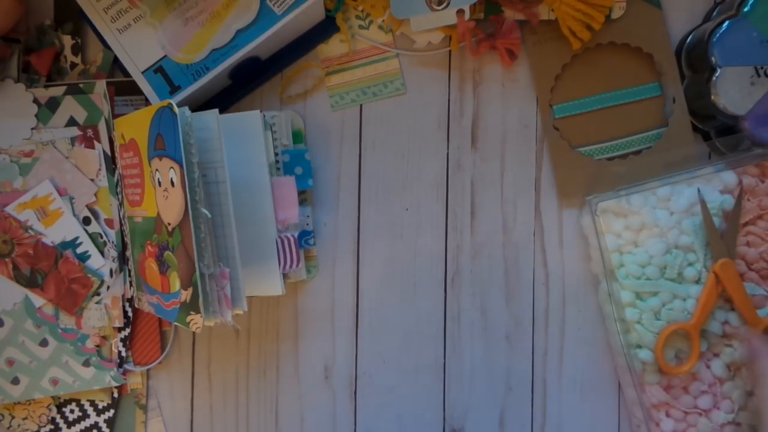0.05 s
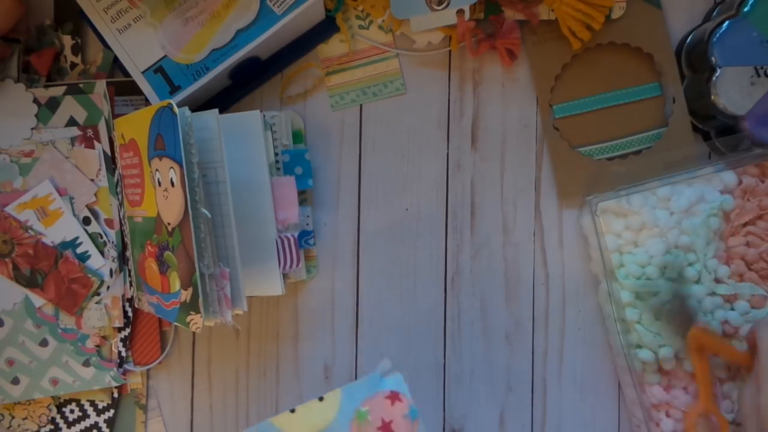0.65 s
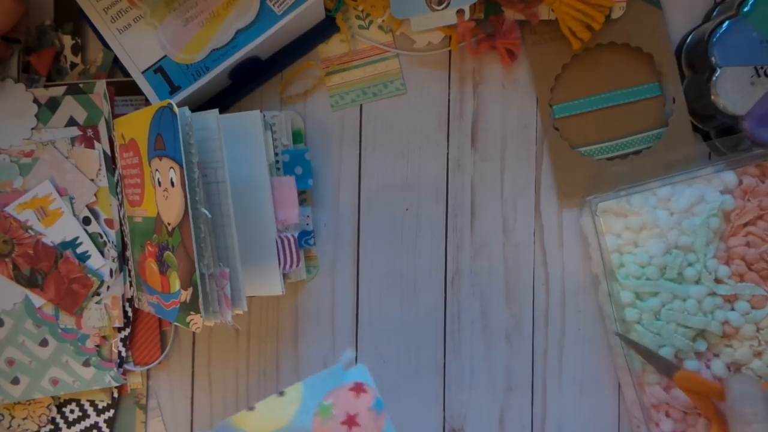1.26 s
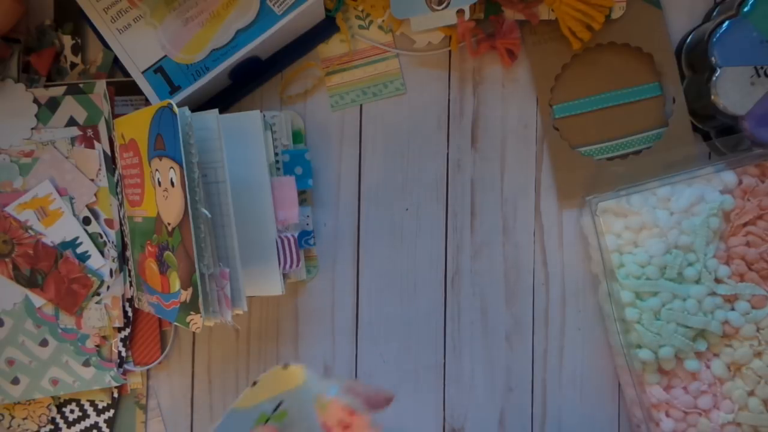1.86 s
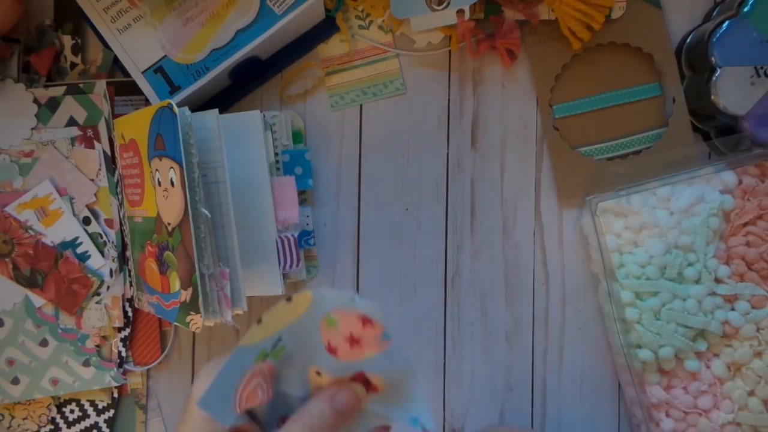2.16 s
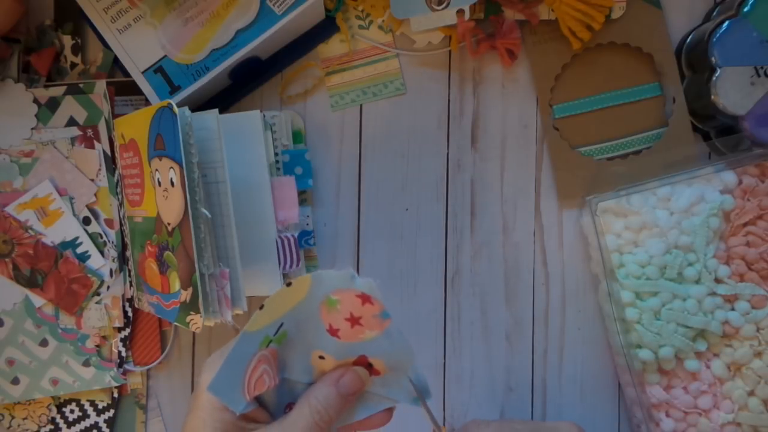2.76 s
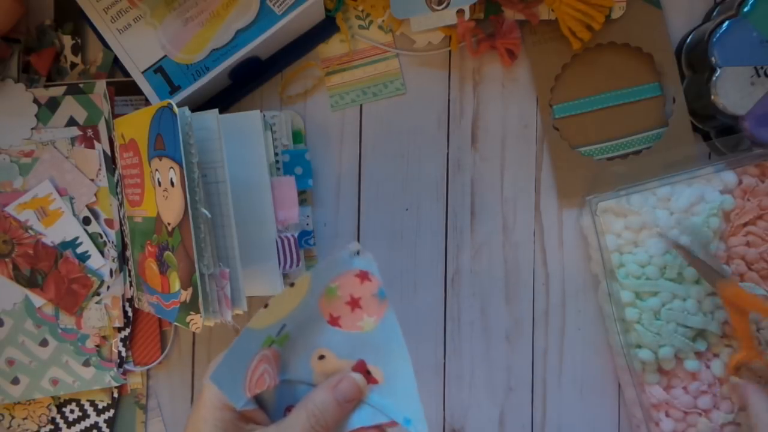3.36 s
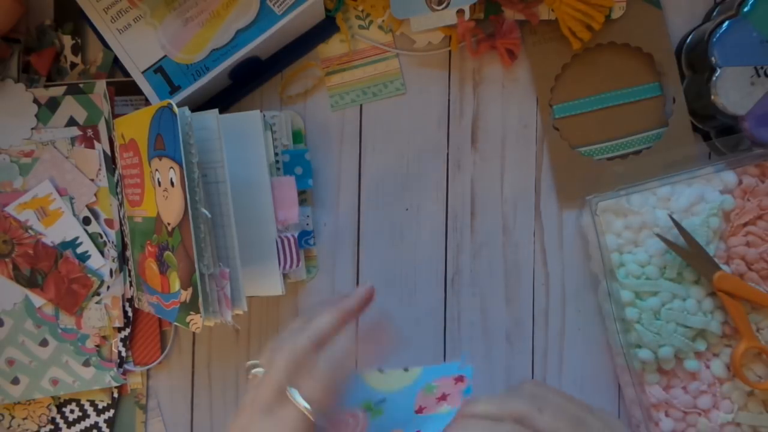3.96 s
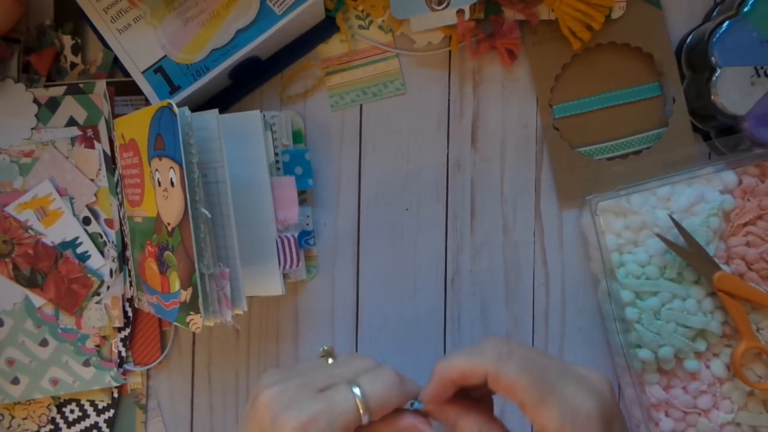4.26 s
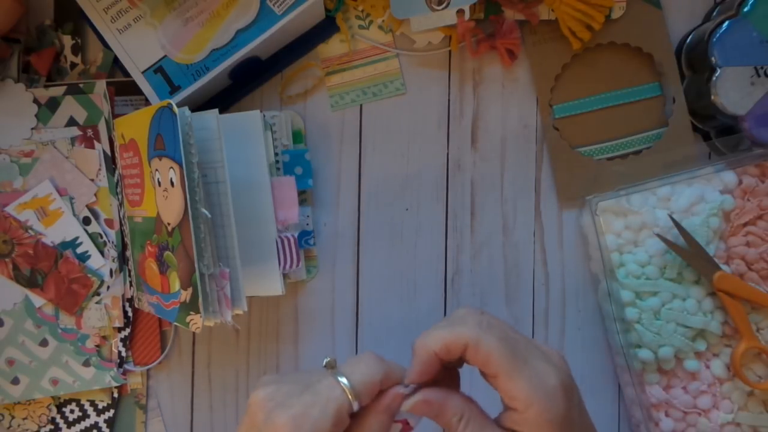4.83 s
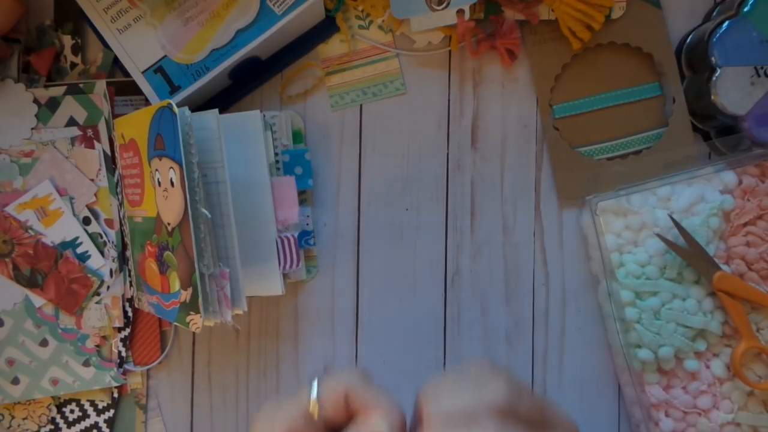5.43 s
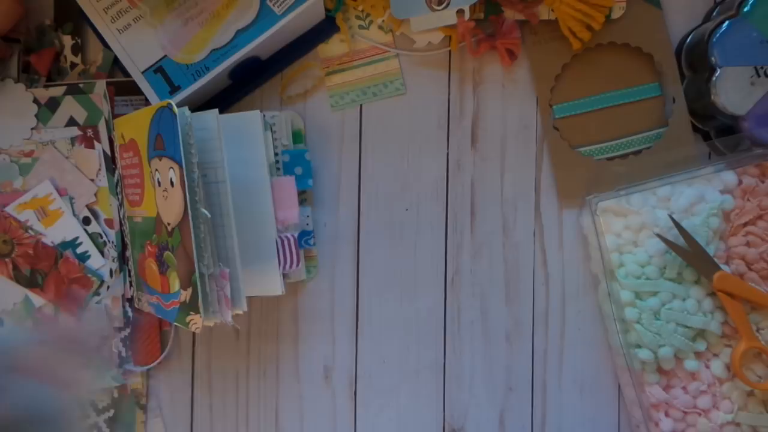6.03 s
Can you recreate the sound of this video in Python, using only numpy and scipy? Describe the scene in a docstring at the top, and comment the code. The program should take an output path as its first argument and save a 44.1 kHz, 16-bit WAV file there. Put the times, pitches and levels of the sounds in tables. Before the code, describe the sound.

Scissors clatter on a plastic box, make a faint snip and are dropped back, then a strip of cotton is quickly ripped.

```python
"""Scissors knock on a plastic box at a craft desk: each blow is a steel click, a ringing lid, rebounds.
Picked up, they rub and scrape; the blades slide open and nick a piece of cotton, a hiss of tiny slips.
They are dropped back on the box. Fingers pluck at the nick, then a strip is ripped off: a fast run of
snapping threads that makes the taut cloth rasp and drum. Behind it: a small room, faint rumble and hiss."""
import sys
import numpy as np
from scipy import signal
from scipy.fft import rfft, irfft
from scipy.io import wavfile

SR = 44100
rng = np.random.default_rng(int(sys.argv[2]) if len(sys.argv) > 2 else 0)


def pcm_store(signal):
    """Save signal as 16-bit PCM."""
    levels = np.round(np.clip(np.atleast_2d(signal), -1, 1) * 32767)
    wavfile.write(sys.argv[1], SR, levels.astype(np.int16).T)


N = 272934
TIME = np.arange(N) / SR


# Blows on the box: t/s, relative click level/dB, relative thump level/dB, hardness/(dB/octave)
KNOCKS = [(0.1754, -8, -21.5, 3.5), (0.2028, -17, -33, -5), (0.3501, -14.5, -26, -3), (0.3934, -18, -32, 8),
          (0.5342, -34, -33.5, -7), (0.5531, -24.5, -37, -10), (0.5692, -20.5, -26, -10),
          (0.5739, -17.5, -29.5, 4.5), (0.61, -20.5, -36, -2), (0.6387, -28.5, -36.5, 5),
          (0.6687, -36, -34, -6), (0.7467, -9, -22.5, 6), (0.7574, -16.5, -34, 4),
          (0.852, -16.5, -27.5, -8.5), (0.8659, -25, -35.5, -7), (0.9512, -28.5, -42.5, 5),
          (1.0369, -42, -38.5, -10.5), (1.1453, -37, -44.5, -6), (1.1896, -34, -29, -2.5),
          (1.2865, -25, -31, -0.5), (1.2988, -33, -36.5, 7), (1.3452, -36, -40, 5.5), (1.409, -31, -37, 7),
          (1.4151, -21, -37, -1), (1.548, -26, -32, -3.5), (3.4758, -16, -22.5, 13.5),
          (3.481, -1.5, -17.5, 10), (3.5218, -0.5, -12, 5), (3.5335, -9, -23, 5), (3.5703, -12, -23, 12.5),
          (3.5965, -8.5, -24, -1), (3.6102, -1.5, -16.5, 1), (3.6501, -32, -30.5, 4),
          (3.6765, -24, -32.5, -4), (3.723, -38, -42, 0)]
# Lid modes: f/Hz, level/dB, t60/s
LID_MODES = [(135.3, -17, 0.16), (226.6, -6.5, 0.072), (273, -6, 0.039), (331, 4, 0.022),
             (403, -0.5, 0.029), (451, -7.5, 0.05), (641, -15, 0.042), (860, -9.5, 0.014)]
# Steel-on-plastic spectrum: f/Hz, level/dB
CLICK_SPECTRUM = [(300, -0.5), (900, 2), (1800, 1.5), (2700, -1.5), (4200, -8), (6500, -3.5), (8000, -5.5),
                  (10500, 1), (13000, -5), (16000, -9)]
def knocks(click_db=-3, thump_db=7, rise_s=0.0013, rebound_s=0.021, rebound_db=-19.5):
    """Steel clicks, rings the lid and rebounds twice. Returns direct and smoother all-round sound."""
    t, out = np.arange(SR // 8) / SR, np.zeros((2, N))
    hz, mode_db, t60_s = np.transpose(LID_MODES)[:, :, None]
    octaves = np.log2(np.maximum(hz, 175) / np.median(hz))
    spots = rng.standard_normal((len(KNOCKS), 2, len(LID_MODES), 1))  # each spot rings differently
    gaps_s = rebound_s * (0.5 + rng.random((len(KNOCKS), 2)))
    for (s, click, thump, hardness), (detune, weight), gap_s in zip(KNOCKS, spots, gaps_s):
        ring_db = mode_db + hardness * octaves + 1.5 * weight
        # A soft blow stays on the lid; its weight lowers the pitch.
        ring_hz = hz * (1 + 0.04 * detune + 0.013 * min(hardness, 0))
        modes = amp(ring_db - 60 * t / t60_s) * np.sin(2 * np.pi * ring_hz * t)
        lid = amp(thump + thump_db) * modes.sum(0) * (1 - np.exp(-t / rise_s)) / 2
        # Blades click brighter than handles: treble follows the click's lead over the thump.
        tilt_db_oct = 0.19 * (click - thump - 11.5)
        contact = burst(t60_s=0.024, scatter_db=8, size=len(t))
        impulse = np.linalg.norm(contact) * (t == 0)
        for path, push in zip(out, [contact, impulse]):
            blow = lid + amp(click + click_db) * colour(push, CLICK_SPECTRUM, tilt_db_oct)
            for k, at_s in enumerate(np.cumsum([s, *gap_s])):
                add(path, at_s, amp(k * rebound_db) * blow)
    # A small box radiates no deep bass.
    return signal.sosfilt(signal.butter(3, 120, "high", fs=SR, output="sos"), out)


# Tugs of the rip: t/s, length/s, relative fine-thread level/dB, rasp gain/dB, drum level/dB
TUGS = [(5.591, .008, -35.5, 17, -48), (5.609, 0.034, -31, 4, -44), (5.646, 0.048, -27.5, 6, -49.5),
        (5.711, .046, -30, -16.5, -39), (5.766, .063, -31.5, -2, -53), (5.828, 0.0445, -25, -8, -38.5)]
def tugs(levels_db):
    """Gain curve of the pulls on the cloth, each at its own level."""
    return sum(amp(db) * envelope(s, length_s, attack_s=0.0018, release_s=0.048)
               for (s, length_s, *_), db in zip(TUGS, levels_db))


# Strongest threads breaking: t/s, relative level/dB
SNAPS = [(5.5943, -19.5), (5.612, -8.5), (5.622, -11), (5.66, -15.5), (5.7135, -4), (5.73, -4),
         (5.7355, -2.5), (5.7491, 0), (5.7541, 1), (5.7673, -2.5), (5.7781, -2), (5.7872, -1.5),
         (5.8035, -1), (5.8128, -0.5), (5.8349, -3), (5.8488, -2)]
# Breaking-thread spectrum: f/Hz, level/dB
THREAD_SPECTRUM = [(30, -26.5), (80, -10.5), (220, -8), (350, -1), (750, 1), (1200, -4.5), (2000, 0),
                   (3050, 2), (3600, 0), (4800, 1), (7000, -2), (10000, -0.5), (12800, 2), (16000, -1)]
# Held-cloth resonances: f/Hz, width/Hz, level/dB
CLOTH_MODES = [(612, 110, -5.5), (2406, 56, 3.5), (2990, 290, -1.5), (4860, 510, -13), (5750, 210, -6)]
def rip(snap_db=-2, fine_db=-4):
    """Threads break in turn; each snap shakes the taut cloth in its own way for a few milliseconds."""
    start_s, length_s, threads_db, rasp_db, _ = np.transpose(TUGS)
    breaks = grains(per_s=900, spread_db=3) * rng.choice([-1, 1], N)
    breaks = unit_rms(breaks) * tugs(threads_db + fine_db)
    for s, db in SNAPS:
        add(breaks, s, amp([db + snap_db]))
    shakes = np.zeros(N)
    for i in np.flatnonzero(breaks):
        add(shakes, i / SR, breaks[i] * burst(t60_s=0.026, scatter_db=5.5))
    cloth = colour(shakes, THREAD_SPECTRUM)
    rasp = sum(amp(db) * signal.lfilter(*signal.iirpeak(hz, hz / width_hz, SR), cloth)
               for hz, width_hz, db in CLOTH_MODES)
    # Most rasp while the hands are still close together.
    return cloth + rasp * amp(np.interp(TIME, start_s + length_s / 2, rasp_db))


def cloth_drum(slack_hz=255, taut_hz=365, half_width_hz=90):
    """The cloth drums low; its resonance rises with tension, peaking at mid-rip."""
    start_s, length_s, _, _, drum_db = np.transpose(TUGS)
    progress = np.interp(TIME, [start_s[0], start_s[-1] + length_s[-1]], [0, 1])
    hz = slack_hz + (taut_hz - slack_hz) * np.sin(np.pi * progress)
    noise = rng.standard_normal(N) + 1j * rng.standard_normal(N)
    shake = signal.sosfilt(signal.butter(2, half_width_hz, fs=SR, output="sos"), noise)
    carrier = np.exp(2j * np.pi * np.cumsum(hz) / SR)
    return unit_rms((shake * carrier).real) * tugs(drum_db)


# Thread and weave ticks around the rip: t/s, relative level/dB, tilt/(dB/octave)
TICKS = [(4.302, -39, -3.5), (5.102, -37.5, 1.5), (5.485, -35.5, -3.5), (5.562, -28, -2.5),
         (5.565, -31.5, 3), (5.976, -25.5, 5), (6.173, -43, -4)]
def thread_ticks(gain_db=-3):
    """Lone threads give way under the fingers."""
    out = np.zeros(N)
    for s, db, tilt_db_oct in TICKS:
        snap = burst(t60_s=0.022, scatter_db=11)
        add(out, s, amp(db + gain_db) * colour(snap, THREAD_SPECTRUM, tilt_db_oct))
    return out


# Sliding strokes: t/s, length/s, end level/dB
SLIDES = [(.24, 0.072, -56.5), (.68, 0.053, -43.5), (1.18, 0.012, -46.5), (1.195, 0.11, -48),
          (1.408, 0.0088, -41), (1.533, .022, -38.5), (1.638, 0.011, -51.5), (4.58, 0.13, -68.5),
          (5.13, 0.097, -73)]
# Sliding spectrum: f/Hz, level/dB
SLIDE_SPECTRUM = [(40, -34), (150, 16.5), (400, 12), (900, 9.5), (2400, 1.5), (4500, 1.5), (7000, 4),
                  (10000, 3.5), (13000, 6), (16000, -6)]
def slides(grip_db=-64.5):
    """Blades and fingers slide over plastic and cloth; the hand rubs the scissors as it lifts them."""
    grip = amp(grip_db) * envelope(start_s=0.12, length_s=1.54, attack_s=0.05, release_s=0.52)
    return friction(strokes(SLIDES) + grip, SLIDE_SPECTRUM, per_s=5200, spread_db=1)


# Blade strokes: t/s, length/s, end level/dB
SHEARS = [(1.263, 0.024, -37), (1.643, .012, -44.5), (2.822, 0.041, -58), (2.868, 0.024, -55),
          (2.895, .015, -56), (2.922, 0.021, -54)]
# Shearing spectrum: f/Hz, level/dB
SHEAR_SPECTRUM = [(40, -48), (250, 0.5), (1200, -3), (2500, -7.5), (5000, -11), (7200, -8), (8200, -10),
                  (9600, 6), (11000, -6), (13500, -2), (16000, -7.5)]
def blade_shear():
    """The blades shear past each other: dense slips, a fine hiss."""
    return friction(strokes(SHEARS), SHEAR_SPECTRUM, per_s=22000, spread_db=-2)


# Handle strokes: t/s, length/s, end level/dB
SCRAPES = [(.675, 0.0476, -44.5), (1.1, .025, -53), (1.19, 0.107, -52)]
# Scraping spectrum: f/Hz, level/dB
SCRAPE_SPECTRUM = [(40, -15), (150, -2), (400, 15.5), (700, 0), (1100, 1), (1600, 1), (2200, 5.5),
                   (3000, -3), (4200, -14), (16000, -15)]
def handle_scrape():
    """The handles scrape over the lid: sparse slips, a coarse grain."""
    return friction(strokes(SCRAPES), SCRAPE_SPECTRUM, per_s=560, spread_db=2.5)


def friction(gain, spectrum, per_s, spread_db):
    """Tiny slips crowd into a hiss under a gain curve."""
    slips = unit_rms(grains(per_s, spread_db) * rng.standard_normal(N))
    return colour(slips * gain, spectrum)


def strokes(rows):
    """Gain curve of strokes that gather speed, then stop."""
    return sum(amp(db) * envelope(s, length_s, attack_s=0.0068, release_s=0.015, swell_db=10)
               for s, length_s, db in rows)


# Desk, shelf and wall reflections: delay/s, gain/1
ECHOES = [(.0031, 0.15), (.0094, 0.13), (0.0124, .22), (0.0155, 0.12)]
# Room decay: f/Hz, t60/s
ROOM_DECAY = [(120, 0.39), (400, 0.3), (1200, 0.34), (3000, 0.27), (8000, 0.27), (13000, 0.21),
              (16000, 0.2)]
def room(direct, all_round, wet_db, build_s=0.0027, fade_hz=7, tails=3, null_hz=157.4, null_width_hz=32):
    """Direct sound, near reflections and a smooth diffuse tail, steadily crossfaded among noise decays."""
    out = direct.copy()
    for s, gain in ECHOES:
        add(out, s, gain * direct)
    for k in range(tails):
        hz, t, noise = signal.stft(rng.standard_normal(SR // 2), SR, nperseg=256)
        decay = amp(-60 * t / lookup(ROOM_DECAY, hz)[:, None])
        tail = signal.istft(noise * decay * (1 - np.exp(-t / build_s)), SR, nperseg=256)[1]
        share = np.sqrt(2 / tails) * np.cos(np.pi * (fade_hz * TIME + k / tails))
        out += amp(wet_db) * signal.oaconvolve(all_round * share, tail / np.linalg.norm(tail))[:N]
    # Reflections cancel a narrow band of bass.
    return signal.lfilter(*signal.iirnotch(null_hz, null_hz / null_width_hz, SR), out)


# Background spectral density: f/Hz, relative level/dB
FLOOR_SPECTRUM = [(15, -60.5), (25, -10), (43, -1.5), (123, -3), (185, -3.5), (217, -3.5), (270, -8),
                  (384, -10.5), (416, -11), (962, -17.5), (1740, -21.5), (9070, -26.5), (11600, -26),
                  (16000, -28.5)]
def noise_floor(level_db=-66.5, waver_db=1, split_hz=500):
    """Steady microphone hiss over a slightly wavering room rumble."""
    shape = amp(lookup(FLOOR_SPECTRUM, np.fft.rfftfreq(N, 1 / SR)))
    noise = unit_rms(irfft(rfft(rng.standard_normal(N)) * shape, N))
    rumble = signal.sosfiltfilt(signal.butter(2, split_hz, fs=SR, output="sos"), noise)
    hiss = noise - rumble
    drift = sum(np.sin(2 * np.pi * (hz * TIME + rng.random())) for hz in np.geomspace(1, 10, 20))
    return amp(level_db) * (amp(waver_db * unit_rms(drift)) * rumble + hiss)


def grains(per_s, spread_db):
    """Impulses at random times; a few stray far from the usual size."""
    sizes = amp(spread_db * np.minimum(rng.exponential(1, N), 3))
    return sizes * (rng.random(N) < per_s / SR)


def burst(t60_s, scatter_db, size=2048):
    """Unit impulse followed by dying scatter."""
    scatter = rng.standard_normal(size) * amp(-60 * np.arange(size) / SR / t60_s)
    scatter *= amp(scatter_db) / np.linalg.norm(scatter)
    scatter[0] = 1
    return scatter


def envelope(start_s, length_s, attack_s, release_s, swell_db=0):
    """Linear attack, swell up to gain 1, then a fall of 60 dB per release_s."""
    t = TIME - start_s
    rise_db = swell_db * np.clip(t / length_s - 1, -1, 0)
    fall_db = 60 * np.clip((t - length_s) / release_s, 0, 2)
    return np.clip(t / attack_s, 0, 1) * amp(rise_db - fall_db)


def colour(x, spectrum, tilt_db_oct=0, size=2048):
    """Minimum-phase, unit-energy filter with the given spectrum, tilted above 1 kHz."""
    hz = abs(np.fft.fftfreq(size, 1 / SR))
    db = lookup(spectrum, hz) + tilt_db_oct * np.log2(np.maximum(hz, 1000))
    log_response = np.conj(signal.hilbert(np.log(amp(db))))
    taps = np.fft.ifft(np.exp(log_response)).real
    return signal.oaconvolve(x, taps / np.linalg.norm(taps))[:len(x)]


def lookup(table, hz):
    """Interpolates on a log-frequency axis."""
    table_hz, values = np.transpose(table)
    return np.interp(np.log(hz + 1), np.log(table_hz + 1), values)


def add(mix, s, sound):
    """Mixes a sound in at time s."""
    part = mix[round(s * SR):][:len(sound)]
    part += sound[:len(part)]


def amp(db):
    """Decibels to gain."""
    return 10 ** (np.asarray(db) / 20)


def unit_rms(x):
    """Scales to rms 1."""
    return x / np.sqrt(np.mean(x ** 2) + 1e-20)


def scene():
    """Scissors and cloth close to one microphone; both channels alike."""
    rubbing = slides() + blade_shear() + handle_scrape()
    scissors, all_round = knocks() + rubbing
    cloth = rip() + cloth_drum() + thread_ticks()
    mono = room(scissors, all_round, wet_db=-9.5) + room(cloth, cloth, wet_db=-11) + noise_floor()
    return np.array([mono, mono])


def record(dry, allpass_coeff=0.4, cutoff_hz=15850):
    """Microphone phase lag turns each sharp click into a dip and a spike; a low-pass follows."""
    lagged = signal.lfilter([-allpass_coeff, 1], [1, -allpass_coeff], dry)
    lowpass = signal.firwin(511, cutoff_hz, window=("kaiser", 9), fs=SR)
    return signal.oaconvolve(lagged, lowpass[None], "same")


dry = scene()
out = record(dry)
pcm_store(out)
```